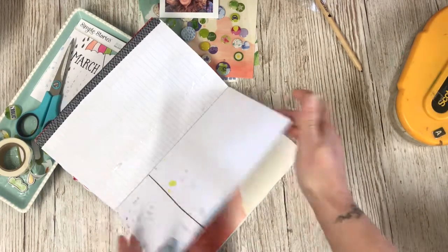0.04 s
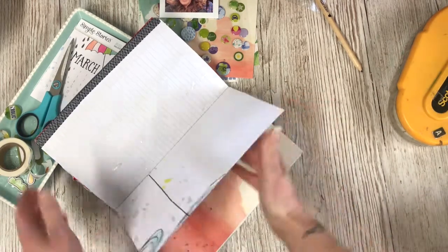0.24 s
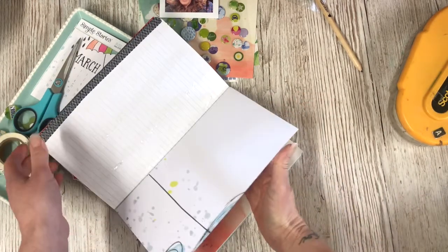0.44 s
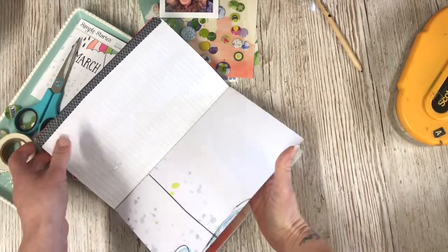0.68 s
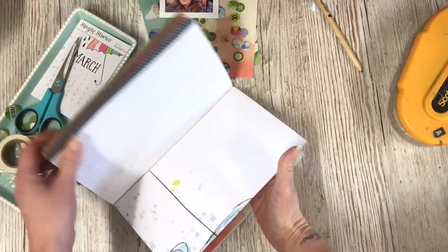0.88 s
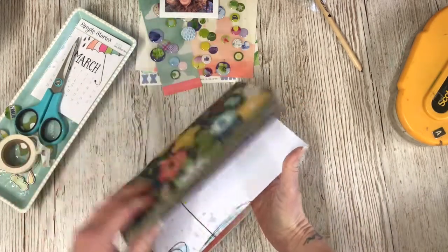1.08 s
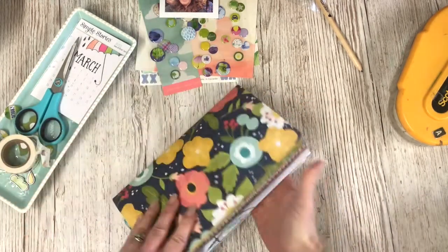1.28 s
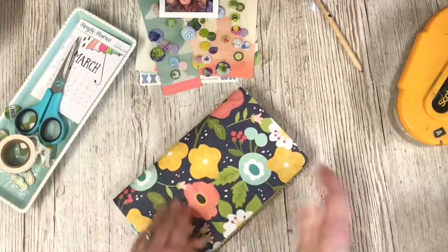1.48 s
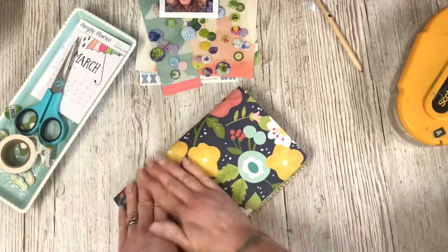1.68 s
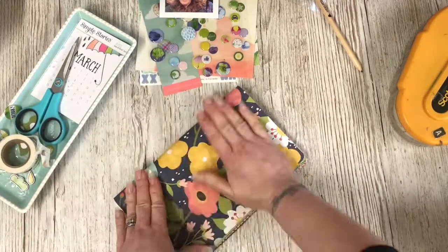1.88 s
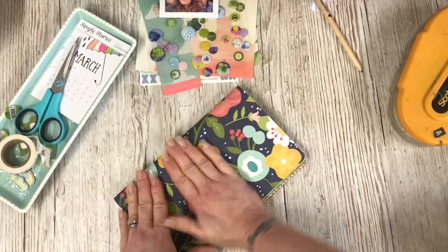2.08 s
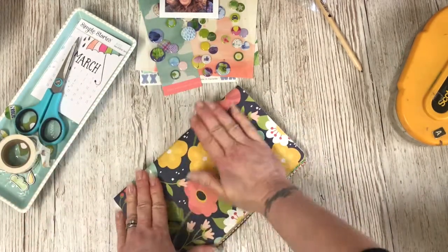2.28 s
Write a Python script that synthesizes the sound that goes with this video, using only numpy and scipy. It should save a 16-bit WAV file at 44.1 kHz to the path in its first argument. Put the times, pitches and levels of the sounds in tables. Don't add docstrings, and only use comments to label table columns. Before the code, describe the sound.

Paper handling: a notebook crackles closed on a wooden table and is smoothed by hand strokes

```python
import sys
import numpy as np
from scipy import signal
from scipy.fft import rfft, irfft
from scipy.io import wavfile
from scipy.ndimage import uniform_filter1d

SR = 44100
rng = np.random.default_rng(int(sys.argv[2]) if len(sys.argv) > 2 else 0)


def elevation(decibels):
    levels = np.asarray(decibels, float)
    return 10 ** (levels / 20)


def inscribe(sig):
    pcm = np.round(np.clip(np.atleast_2d(sig).T, -1, 1) * 32767)
    wavfile.write(sys.argv[1], SR, pcm.astype(np.int16))


N = 103546
T = np.arange(N) / SR


def unit(x):
    return x / np.sqrt(np.mean(x ** 2))


def band(x, hz, width, order=1):
    k = np.sqrt(1 + width)
    high = min(hz * k, 0.45 * SR)
    return signal.sosfilt(signal.butter(order, [hz / k, high], "band", fs=SR, output="sos"), x)


def colour(x, table):
    hz, db = np.array(table).T
    f = np.arange(len(x) // 2 + 1) * SR / len(x) + 1
    gain = elevation(np.interp(np.log(f), np.log(hz), db))
    return unit(irfft(rfft(x) * gain, len(x)))


def walk(rate):
    k = int(SR / rate)
    steps = np.repeat(rng.standard_normal(N // k + 1), k)
    return unit(uniform_filter1d(uniform_filter1d(steps, k), k)[:N])


def grains(spread_db):
    size = np.minimum(rng.exponential(size=N), 4)
    return unit(rng.standard_normal(N) * elevation(spread_db * size))


def add(out, s, x, db):
    i = int(s * SR)
    x = x[:N - i]
    out[i:i + len(x)] += x * elevation(db) / np.abs(x).max()


def fade(t60, size=8192):
    return np.exp(-np.log(1000) * T[:size] / max(t60, 0.002))


def room():
    # (frequency [Hz], level [dB])
    air_colour = [(25, -51), (45, -3), (110, -3), (300, -17.5), (1000, -21), (3000, -26), (7000, -29.5),
                  (16000, -36)]
    air_db, waver_db = -61.5, 1.2
    hum_hz, hum_db, rumble_hz, rumble_db = 99.4, -65, 45.4, -69
    air = 0
    for hz in 40 * 2.0 ** np.arange(9):
        noise = colour(rng.standard_normal(N), air_colour)
        air = air + band(noise, hz, 1.0, order=2) * elevation(waver_db * walk(12))
    unsteady = unit(band(rng.standard_normal(N), hum_hz, 0.2))
    hum = unit(np.sin(2 * np.pi * hum_hz * T) + 0.3 * unsteady)
    rumble = unit(band(rng.standard_normal(N), rumble_hz, 0.37, order=2))
    return elevation(air_db) * air + elevation(hum_db) * hum + elevation(rumble_db) * rumble


def scrapes():
    # (start [s], length [s], level [dB], body pitch [Hz], treble [dB])
    strokes = [(0, 0.16, -65.5, 1230, -27), (0.023, 0.064, -62, 1780, -10), (0.072, 0.04, -59.5, 1500, -31),
               (0.12, 0.066, -58, 2300, -13), (0.185, 0.015, -52.5, 2250, -11),
               (0.196, 0.0072, -54.5, 3460, -11), (0.24, 0.041, -44.5, 2980, -24),
               (0.257, 0.038, -44, 3020, -20), (0.285, 0.083, -59, 3000, -21),
               (0.349, 0.14, -55, 1450, -4.5), (0.44, 0.13, -65.5, 477, -33), (0.606, 0.18, -62, 1940, -27),
               (0.681, 0.01, -60.5, 1980, 10), (0.732, .06, -73, 2500, -23), (0.82, 0.049, -82, 2500, -12),
               (0.917, 0.022, -62, 1740, -28), (0.93, 0.47, -75, 5130, 8.5), (1.153, 0.015, -57, 1670, -34),
               (1.223, 0.43, -64.5, 2520, -4.5), (1.391, 0.14, -56, 1870, -21),
               (1.508, 0.025, -58.5, 3200, -25), (1.548, 0.077, -46.5, 3220, -28),
               (1.572, 0.022, -44, 3500, -24), (1.602, 0.16, -62, 1300, -25),
               (1.741, 0.023, -49.5, 930, -6), (2.308, 0.082, -57, 2480, -3)]
    grain_db, flutter_db, patch_db, modes_db = 3.5, 2.4, 3.5, 2
    slope_db, tilt_db = 3.5, 1.1
    attack, tail_s = 0.15, 0.0088
    friction = grains(grain_db) * elevation(flutter_db * walk(150))
    hiss = unit(band(friction, 8300, 8.8))
    centres = 250 * 2 ** np.arange(0, 6, 0.25)
    uneven = np.minimum(1, 3000 / centres)
    sheet = []
    for k, f in enumerate(centres):
        patch = unit(band(friction, f, 0.19, order=2)) * (-1) ** k
        sheet.append(patch * elevation(patch_db * uneven[k] * walk(120)))
    sheet = np.array(sheet)
    out = np.zeros(N)
    for s, length, db, hz, top_db in strokes:
        rise = np.clip((T - s) / (attack * length), 0, 1)
        fall = np.exp(-np.clip(T - s - 0.57 * length, 0, 1) / (tail_s + 0.16 * length))
        octaves = np.log2(centres / hz)
        scatter = modes_db * rng.standard_normal(len(centres)) * uneven
        gains = elevation(scatter - slope_db * abs(octaves) + tilt_db * octaves)
        out += elevation(db) * rise * fall * (unit(gains @ sheet) + elevation(top_db) * hiss)
    return out


def pops():
    # (time [s], peak [dB],
    # pitch [Hz], T60 [s])
    buckles = [(.079, -45.5, 898, 0.12), (.083, -40, 1790, .03), (0.2097, -40.5, 443, 0.035),
               (0.3423, -41, 936, 0.041), (0.349, -48, 940, 0.1), (.3768, -38.5, 8500, 0.0041),
               (.3855, -35.5, 987, 0.014), (0.431, -45, 3360, 0.011), (.249, -40, 4820, 0.011),
               (.696, -48.5, 295, 0.07), (.726, -61, 288, .06), (0.2395, -32.5, 1170, 0.012),
               (0.2397, -35, 2800, 0.017), (0.2574, -34.5, 6030, 0.0092), (0.2575, -36, 11600, .01),
               (0.2622, -41, 1813, 0.044), (0.265, -37, 1740, .03), (0.2755, -36.5, 1470, 0.013),
               (0.279, -39, 6430, 0.011), (0.687, -39, 3030, 0.019), (.8425, -44.5, 271, 0.055),
               (.844, -46, 393, 0.065), (.856, -52, 390, 0.078), (1.4286, -44, 810, 0.027),
               (1.429, -46.5, 1275, 0.055), (1.427, -46, 2790, 0.022), (1.465, -52, 2090, .02),
               (1.469, -50, 792, 0.046), (1.474, -45, 820, 0.029), (1.499, -55, 1020, .02),
               (1.5158, -41, 3200, .02), (1.521, -37, 3000, 0.024), (1.5225, -43, 2180, 0.039),
               (1.529, -41, 3420, 0.021), (1.5777, -20.5, 6560, 0.0027), (1.577, -26.5, 1540, .018),
               (1.578, -30.5, 3850, 0.0097), (1.585, -41.5, 646, .04), (1.5923, -34, 4370, 0.011),
               (1.5955, -33, 6940, 0.011), (1.7466, -31.5, 4150, 0.0087), (1.7452, -34, 2470, 0.015),
               (1.7454, -32, 990, 0.0078), (1.7531, -34.5, 1206, 0.017), (1.757, -43, 230, 0.052),
               (1.748, -49, 537, 0.073), (2.2985, -37, 1780, 0.013), (2.2985, -36.5, 3640, 0.011)]
    split = 3 * 0.0343
    out, t = np.zeros(N), T[:8192]
    for s, db, hz, t60 in buckles:
        pair = np.sin(2 * np.pi * hz * t) + 0.5 * np.sin(2 * np.pi * hz * (1 + split) * t)
        add(out, s, fade(t60) * pair, db)
    return out


def snaps():
    # (time [s], peak [dB], pitch [Hz])
    paper_snaps = [(0.084, -44, 930), (0.128, -43, 877), (0.2575, -27.5, 3000), (0.274, -36, 1350),
                   (0.385, -30, 940), (0.564, -37.5, 1570), (0.587, -40, 2280), (0.667, -35, 2020),
                   (0.682, -56, 2660), (0.687, -44, 2970), (0.699, -33.5, 1900), (0.726, -38, 1890),
                   (0.779, -49, 1460), (0.819, -39, 1610), (0.826, -43, 2940), (0.8405, -34, 3600),
                   (0.985, -40.5, 1730), (1.165, -41.5, 1440), (1.373, -46.5, 2000), (1.4285, -39.5, 2500),
                   (1.5255, -34, 3240), (1.7515, -36, 1510)]
    # (time [s], peak [dB], pitch [Hz])
    hard_cracks = [
        (0.2391, -29.5, 5000),
        (0.3422, -33, 1600),
        (1.7449, -27, 3480),
        (2.2985, -35, 3000),
        (2.3174, -38, 4550),
        (2.3297, -31.5, 2410),
        (2.3434, -39, 3920),
    ]
    broad_db, spike_db = -3.5, 6.5
    out = np.zeros(N)
    for table, t60 in ((paper_snaps, 0.032), (hard_cracks, 0.016)):
        for s, db, hz in table:
            burst = rng.standard_normal(2048) * fade(t60, size=2048)
            burst[0] += 3 * elevation(spike_db)
            ring = unit(band(burst, hz, 0.92))
            broad = unit(band(burst, 5800, 23.0))
            add(out, s, ring + elevation(broad_db) * broad, db)
    return out


def knocks():
    # (time [s], peak [dB], pitch [Hz], T60 [s])
    cover_knocks = [(0.208, -44.5, 418, 0.18), (0.264, -41, 396, 0.24), (0.384, -45, 382, 0.12),
                    (0.425, -44, 192, 0.24), (0.702, -39.5, 248, 0.11), (0.716, -44, 280, 0.092),
                    (0.843, -48.5, 183, 0.16), (1.47, -59, 196, 0.069), (1.576, -36.5, 494, 0.14),
                    (1.754, -42, 272, 0.13), (1.837, -42.5, 195, 0.08), (2.096, -51, 215, 0.1)]
    out = np.zeros(N)
    for s, db, hz, t60 in cover_knocks:
        add(out, s, band(rng.standard_normal(8192) * fade(t60), hz, 0.79), db)
    return out


def clinks():
    # (time [s], peak [dB])
    first_taps = [
        (.377, -30.5),
        (.402, -40),
        (0.419, -44),
        (.452, -44),
        (.464, -54),
    ]
    # (frequency [Hz], level [dB], T60 [s])
    first_modes = [(2940, -11.5, 0.041), (3950, -7.5, 0.039), (4355, -12.5, 0.084), (5190, -2.5, 0.029),
                   (7020, -13, 0.1), (10000, -12, 0.017), (11500, -19, 0.081), (12500, -15, .032)]
    # (time [s], peak [dB])
    second_taps = [
        (.4305, -33),
        (.442, -48),
        (.46, -50),
    ]
    # (frequency [Hz], level [dB], T60 [s])
    second_modes = [(2290, -17, 0.13), (2970, -10, 0.03), (3896, -2.5, 0.051), (5100, -21, .04),
                    (9540, -7.5, 0.021)]
    out, t = np.zeros(N), T[:8192]
    waver = 1 + 0.3 * walk(250)
    for taps, modes in ((first_taps, first_modes), (second_taps, second_modes)):
        for s, db in taps:
            ring = 0
            for (f, d, t60), phase in zip(modes, rng.random(len(modes))):
                contact = waver[int(phase * N / 2):][:8192]
                ring = ring + elevation(d) * fade(t60) * np.sin(2 * np.pi * (f * t + phase)) * contact
            add(out, s, ring, db)
    return out


def thuds():
    # (time [s], peak [dB], pitch [Hz], T60 [s])
    swings = [
        (0.418, -53, 69, 0.26),
        (0.857, -58, 66, 0.14),
        (1.475, -47.5, 69.4, 0.28),
        (1.606, -40, 61.6, 0.23),
        (1.673, -58, 69, 0.18),
        (1.75, -42.5, 81.4, 0.21),
        (1.8, -44, 63.7, 0.31),
        (1.84, -40, 69, 0.16),
        (2.061, -49.5, 88.5, 0.12),
        (2.122, -48, 62, 0.22),
    ]
    out, t = np.zeros(N), T[:16384]
    for s, db, hz, t60 in swings:
        onset = 1 - np.exp(-t / 0.0025)
        add(out, s, onset * fade(t60, size=16384) * np.sin(2 * np.pi * hz * t), db)
    return out


def bump():
    out = np.zeros(N)
    burst = rng.standard_normal(4096) * fade(0.06, size=4096)
    add(out, 0.55, band(burst, 240, 0.5), -51.5)
    return out


def ticks():
    # (time [s], peak [dB], pitch [Hz])
    crackle = [(0.6679, -39, 7450), (0.8393, -35, 7850), (0.8562, -38, 7550), (0.5745, -53, 12900),
               (0.8874, -49, 7020), (0.919, -50, 13300), (0.9352, -36, 12200), (0.94, -42.5, 12500),
               (0.9482, -38.5, 12400), (0.9635, -50, 14000), (0.9744, -48, 13600), (0.9852, -57, 13400),
               (1.007, -46, 11700), (1.028, -41, 13200), (1.046, -48, 13000), (1.076, -38.5, 11900),
               (1.1006, -40, 6640), (1.106, -39.5, 13100), (1.1248, -44, 13000), (1.1374, -43, 12300),
               (1.145, -42, 7500)]
    out = np.zeros(N)
    for s, db, hz in crackle:
        add(out, s, band(rng.standard_normal(1024) * fade(0.005, size=1024), hz, 0.9), db)
    return out


def rub():
    # (time [s], level [dB])
    palm = [(1.48, -82), (1.54, -51), (1.59, -42.5), (1.64, -50.5), (1.665, -61), (1.743, -63),
            (1.748, -50.5), (1.798, -50.5), (1.831, -40), (1.894, -39), (1.979, -57.5), (2.032, -43),
            (2.07, -38.5), (2.105, -40.5), (2.121, -54.5), (2.214, -39.5), (2.279, -52.5), (2.35, -57)]
    # (frequency [Hz], level [dB])
    hiss_colour = [(350, -49), (600, -8), (1240, -10.5), (1680, -8), (2070, -8.5), (3680, -6), (10300, -6),
                   (13000, -2.5), (16000, -7)]
    grain_db, patch_db = 2, 1.2
    edge_hz, edge_drop = 1450, 0.0033
    dull = 0.13
    s, db = np.array(palm).T
    db = uniform_filter1d(np.interp(T, s, db, left=-120), size=200)
    below_peak = db - db.max()
    edge = edge_hz * np.exp(-edge_drop * below_peak)
    out = 0
    for hz in 700 * 2 ** np.arange(0, 4.7, 0.5):
        x = band(colour(grains(grain_db), hiss_colour), hz, 0.42, order=2)
        low_cut = 1 / np.sqrt(1 + (edge / hz) ** 4)
        treble = elevation(dull * below_peak * max(np.log2(hz / 5000), 0))
        out = out + x * elevation(patch_db * walk(39.62)) * low_cut * treble
    return out * elevation(db)


def drag():
    start, end, db, hz = 1.548, 1.576, -53, 3300
    x = unit(band(grains(3), hz, 0.2, order=2) * elevation(3 * walk(100)))
    return elevation(db) * x * np.clip((T - start) * 100, 0, 1) * (T < end)


def scene():
    near = scrapes() + pops() + snaps() + knocks() + clinks() + thuds() + ticks() + rub()
    tail = rng.standard_normal(8192) * fade(0.1)
    echo = signal.fftconvolve(near, tail / np.linalg.norm(tail))[:N]
    mono = near + elevation(-14) * echo + room() + bump() + drag()
    return np.array([mono, mono])


def top_cut(x):
    return signal.sosfilt(signal.butter(12, 16650, fs=SR, output="sos"), x)


def record(dry):
    x = signal.sosfilt(signal.butter(6, 40, "high", fs=SR, output="sos"), dry)
    notch_hz, notch_db, top_hz = 10560, -5.5, 15850
    x = x - (1 - elevation(notch_db)) * band(x, notch_hz, 0.04)
    x = signal.sosfilt(signal.ellip(8, 0.3, 30, top_hz, fs=SR, output="sos"), x)
    return top_cut(x)


dry = scene()
out = record(dry)
inscribe(out)
```